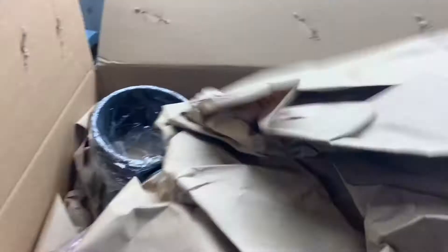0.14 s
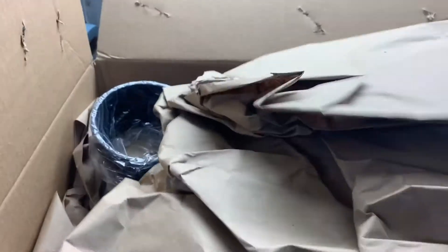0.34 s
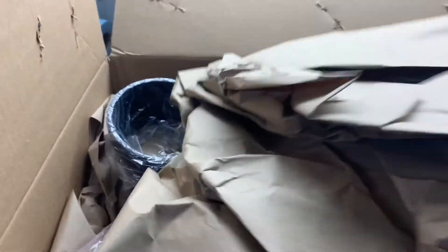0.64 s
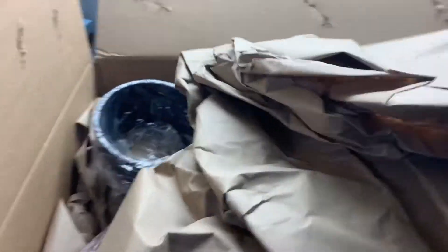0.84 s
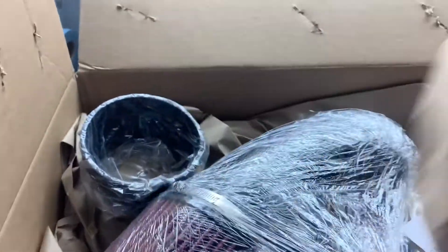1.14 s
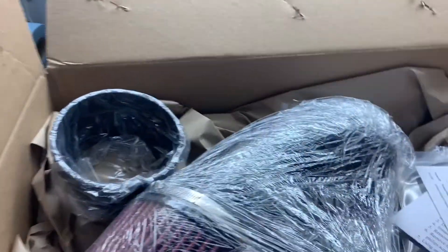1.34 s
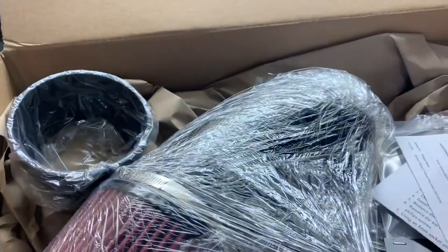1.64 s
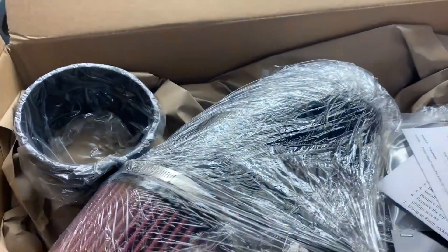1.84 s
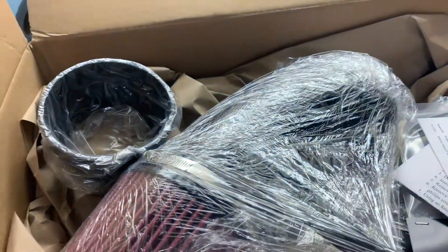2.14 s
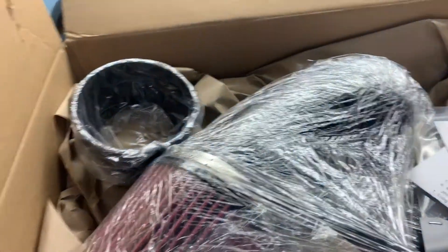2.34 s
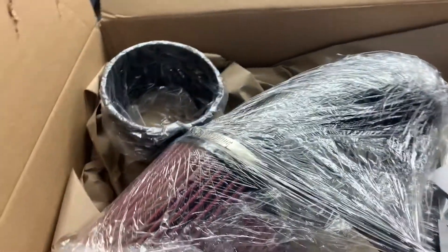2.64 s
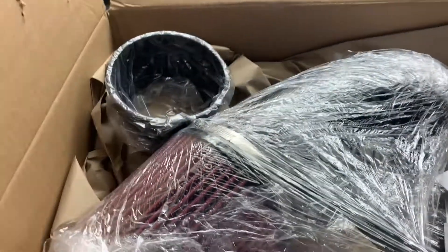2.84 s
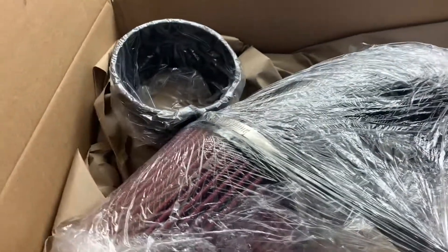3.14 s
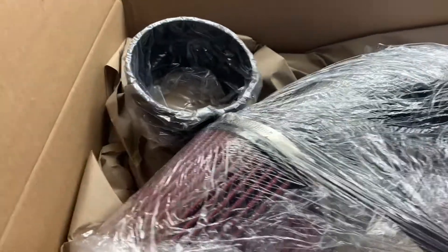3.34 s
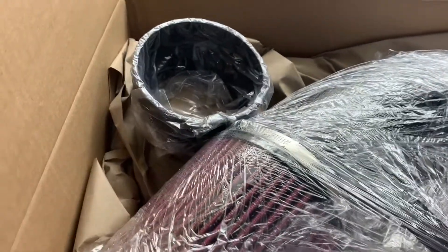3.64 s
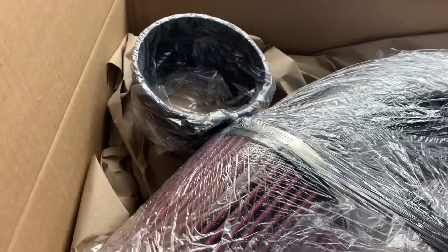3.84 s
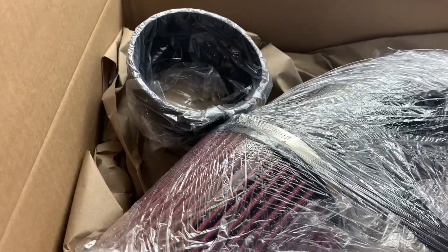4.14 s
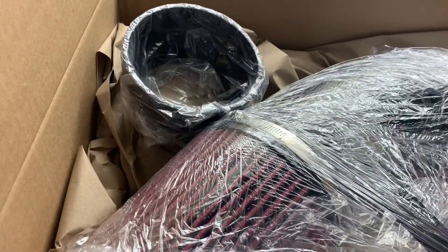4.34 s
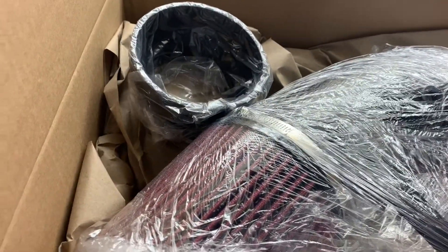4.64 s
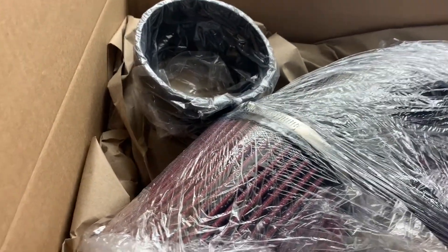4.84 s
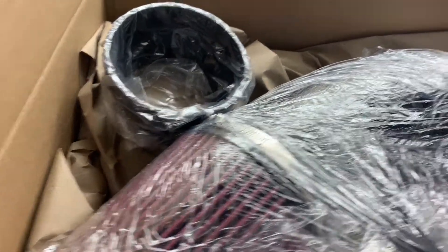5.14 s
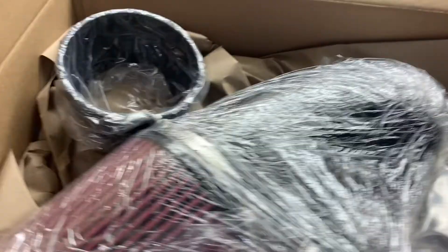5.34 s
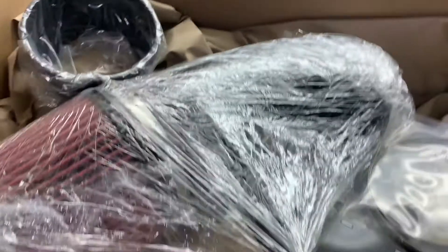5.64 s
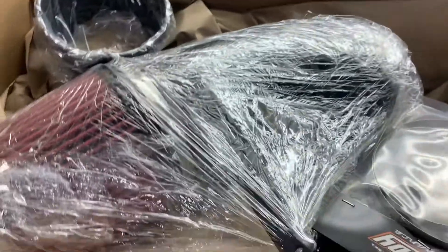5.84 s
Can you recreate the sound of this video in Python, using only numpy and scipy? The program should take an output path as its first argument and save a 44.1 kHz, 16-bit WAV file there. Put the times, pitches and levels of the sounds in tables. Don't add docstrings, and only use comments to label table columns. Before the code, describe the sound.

Stiff packing paper is handled close to a stereo microphone inside a cardboard box, with short dull boxy reflections. From the very start a loud burst of crumpling hits, with small low bumps; until about 1.1 s the sheet is dragged with hissing rustle, clumped crackles and many sharp crease snaps, surging again around 0.7-1.0 s. The rustle then drops to softer, slower folds. Between 1.85 and 2.05 s several low muffled thumps drum on the box walls, the strongest just before 2 s, with a renewed brush of paper. From 2.2 to 3.3 s moderate crinkles and swells continue, gradually thinning. After that it is mostly quiet, with faint easing rustle and separate snaps near 3.6 and 4.45 s, and a brighter, louder one at 4.65 s. Around 5.1-5.5 s wrapping rubs softly and dully along cardboard, followed by tiny settling ticks.

```python
import sys
import numpy as np
from scipy import signal
from scipy.fft import rfft, irfft, next_fast_len
from scipy.io import wavfile
from scipy.ndimage import uniform_filter1d

SR = 44100
rng = np.random.default_rng(int(sys.argv[2]) if len(sys.argv) > 2 else 0)


def to_wav(sig):
    pcm = np.clip(np.atleast_2d(sig), -1, 1) * 32767
    pcm = np.round(pcm).astype(np.int16)
    wavfile.write(sys.argv[1], SR, pcm.T)


def natural_amplitude(level_db):
    exponent = np.asarray(level_db, float) / 20
    return 10 ** exponent


N = 264335

# (time [s], level of the sliding [dB], crispness of the sheet [dB])
DRAG = [(0.0, -31, -3.5), (0.4, -43.5, -2.5), (0.72, -27.5, -4.5), (0.9, -31.5, -4.5), (1.1, -38, 3),
        (1.3, -47.5, 2), (1.5, -51, -13.5), (1.95, -39.5, -3.5), (2.3, -44, -9), (2.53, -37, -4.5),
        (2.99, -38, -6.5), (3.3, -55.5, 3), (3.77, -56, 5.5), (4.03, -66.5, 7), (4.5, -53.5, 6),
        (4.9, -62, 5.5), (5.35, -67.5, -1.5), (5.99, -62, 4)]
# (frequency [Hz], level [dB])
COLOUR = [(160, 6.5), (280, 5.5), (450, -1.5), (700, -0.5), (1100, 0.5), (1500, 1), (2100, 4), (2800, -1),
          (4200, 5.5), (5500, 3.5), (8000, 5), (11000, 4.5), (14000, 3.5), (17000, -11)]
# (frequency [Hz], share heard by both [0-1])
LIKENESS = [(60, 1), (300, 1), (700, 0.9), (1600, 0.79), (2500, 0.04), (4000, 0.27), (7500, 0.022),
            (10000, 0.61), (13000, 0.98)]
# (frequency [Hz], level difference [dB])
TILT = [(60, -1), (110, 1), (200, 1.5), (380, 1), (700, -1.5), (1290, -2), (2380, 0.5), (4400, -1),
        (8120, -2), (15000, 1)]
ANCHORS_HZ = [350, 2100, 9500]

LEFT_LAG = 13
MOST_ALIKE = 0.975


def in_time(rows):
    s, *columns = np.transpose(rows)
    return [np.interp(np.arange(N) / SR, s, c) for c in columns]


def at_hz(points, hz):
    table_hz, values = np.array(points)[:, 0], np.array(points)[:, 1]
    return np.interp(np.log(hz), np.log(table_hz), values)


def following(level_db, share):
    mean_effort_db = -45
    return mean_effort_db + level_db + share * (in_time(DRAG)[0] - mean_effort_db)


def drift(rate):
    r = np.exp(-80 * np.pi * rate / SR)
    slow = signal.lfilter([1], [1, -2 * r, r * r], rng.standard_normal(N // 40 + 2002))[2000:]
    return np.interp(np.arange(N) / 40, np.arange(len(slow)), slow / slow.std())


def dying(power, t60):
    return signal.lfilter([1], [1, -natural_amplitude(-120 / (max(t60, 0.002) * SR))], power + 1e-18)


def port_noise(white, hz):
    alike = np.clip(at_hz(LIKENESS, hz), 0, MOST_ALIKE)
    shared = np.stack([np.roll(white[0], LEFT_LAG), white[0]])
    side = at_hz(TILT, hz) / 2
    both = np.sqrt(alike) * shared + np.sqrt(1 - alike) * white[1:]
    return both * natural_amplitude(np.array([[side], [-side]]))


def bands(low_hz, per_octave, count):
    edges = low_hz * 2 ** (np.arange(count + 1) / per_octave)
    return [(np.sqrt(a * b), signal.butter(2, [a, b], "band", fs=SR, output="sos"))
            for a, b in zip(edges, edges[1:])]


def rumble():
    # (frequency [Hz], level [dB])
    rumble_tone = [(25, -11), (40, -6), (60, -1.5), (100, -2.5), (160, -40)]
    white, out = rng.standard_normal((2, 3, N)), 0
    for k, (hz, sos) in enumerate(bands(17.96, per_octave=1.817, count=6)):
        gain = natural_amplitude(at_hz(rumble_tone, hz) + 0.83 * drift(2.4))
        out = out + signal.sosfilt(sos, gain * port_noise(white[k % 2], hz))
    return natural_amplitude(following(level_db=-3.5, share=0.37) + 27.5) * out


def thumps():
    # (time [s], strength [dB], hardness [dB per octave])
    pushes = [(0.003, -39, 9.5), (0.005, -33, -17), (0.031, -30, -6), (0.7, -37, 7.5), (0.975, -31, 9.5),
              (0.989, -35, 11.5), (1.49, -33.5, 4.5), (1.519, -31, 3), (1.561, -43, -10), (1.865, -24, -3),
              (1.9, -22.5, 1), (1.931, -23.5, 2), (1.956, -19, -1.5), (1.994, -16.5, 3),
              (2.029, -29.5, 2.5), (3.019, -44, 6), (3.139, -41.5, 11.5), (3.238, -46.5, 9.5),
              (3.26, -49, 12.5), (3.535, -48, 11.5), (3.722, -47.5, 12.5), (4.571, -61, 14),
              (4.646, -42, 12.5)]
    # (frequency [Hz], level [dB], t60 [s])
    walls = [(55, 3, 0.051), (70.7, -2.5, 0.43), (87.3, -0.5, 0.39), (125.7, -5.5, 0.34), (273, -9, 0.079),
             (410, -6.5, 0.042)]
    s, strength_db, hardness_db = np.transpose(pushes)
    luck, out = rng.standard_normal((len(s), len(walls))), np.zeros(N)
    for k, (hz, level_db, t60) in enumerate(walls):
        push_db = strength_db + level_db + hardness_db * np.log2(hz / 90) + 0.77 * luck[:, k]
        clicks = np.zeros(N)
        clicks[(s * SR).astype(int)] = natural_amplitude(push_db)
        r, w = natural_amplitude(-60 / (t60 * SR)), 2 * np.pi * hz / SR
        ringing = signal.lfilter([0, np.sin(w)], [1, -2 * r * np.cos(w), r * r], clicks + 1e-18)
        out += (-1) ** k * ringing
    soft = signal.sosfilt(signal.butter(3, [52, 450], "band", fs=SR, output="sos"), out)
    return np.stack([np.roll(soft, LEFT_LAG // 2), soft])


def rub():
    # (frequency [Hz], width [Hz], gain)
    rub_body = [(261, 24, 8.2), (420, 40, 3.5), (915, 41, 2.3)]
    start_s, attack_s, hold_s, release_s = 5.06, 0.1, 0.28, 0.045
    s = start_s + np.cumsum([0, attack_s, hold_s, release_s])
    stroke = np.interp(np.arange(N) / SR, s, [0, 1, 1, 0])
    gain = stroke * natural_amplitude(-56 + 11.5 + 3.2 * drift(21.0))
    sos = signal.butter(4, [230, 1750], "band", fs=SR, output="sos")
    drag = signal.sosfilt(sos, gain * port_noise(rng.standard_normal((3, N)), 470))
    hums = [hum * signal.lfilter(*signal.iirpeak(hz, hz / width_hz, fs=SR), drag)
            for hz, width_hz, hum in rub_body]
    return drag + sum(hums)


def crackle(per_s, spread_db, clump_db, t60, count):
    clumps = natural_amplitude(clump_db * drift(5.0))
    born = rng.random((count, N)) < per_s * clumps / SR
    sizes = natural_amplitude(2 * spread_db * np.minimum(rng.exponential(1, (count, N)), 4))
    trains = dying(dying(born * sizes, t60), t60 / 4)
    return trains / trains.mean(axis=1, keepdims=True)


def rustle():
    anchor_widths_hz = [520, 3500, 9000]
    slide_db, crisp_db = in_time(DRAG)
    lows_db = following(level_db=-4.5, share=0.68)
    bright_db = following(level_db=-6.5, share=0.92) + crisp_db
    levels_db = (lows_db, slide_db, bright_db)
    per_hz = [db - 10 * np.log10(w) for db, w in zip(levels_db, anchor_widths_hz)]

    folds = crackle(per_s=200, spread_db=3.0, clump_db=1.5, t60=0.057, count=4)
    fold_hz = np.geomspace(400, 11000, 4)
    ticks = crackle(per_s=95, spread_db=3.5, clump_db=3.0, t60=0.006, count=2)
    folds = folds + np.repeat(ticks * [[0.1], [0.45]], 2, axis=0)

    white, out = rng.standard_normal((2, 3, N)), 0
    for k, (hz, sos) in enumerate(bands(141.0, per_octave=3, count=21)):
        mix = [np.interp(np.log(hz), np.log(ANCHORS_HZ), row) for row in np.eye(3)]
        reach = np.exp(-(np.log(hz / fold_hz) / 3.0) ** 2)
        grain = 0.25 + 0.87 * reach @ folds / reach.sum()
        drag_db = sum(m * db for m, db in zip(mix, per_hz)) + 2.0 * drift(5.0)
        drag_db = drag_db - 0.21 * crisp_db * np.exp(-(np.log(hz / 830) / 0.58) ** 2)
        gain = natural_amplitude(drag_db) * np.sqrt(grain * SR / 2)
        out = out + natural_amplitude(at_hz(COLOUR, hz)) * signal.sosfilt(sos, gain * port_noise(white[k % 2], hz))
    return out


def creases(rows, sudden):
    size = 8192
    strain_s, strain_db = 0.012, -18
    t = np.arange(size) / SR
    age = np.maximum(t - strain_s, 0)
    strain = natural_amplitude(strain_db) * np.clip(t / strain_s, 0, 1) ** 2 * np.exp(-age / 0.0013)
    crack = (age / 0.00084 * np.exp(1 - age / 0.0007)) ** 2

    hz = np.maximum(np.arange(size // 2 + 1) * SR / size, 10)
    alike = np.clip(at_hz(LIKENESS, hz), 0, MOST_ALIKE) ** 0.66
    side = at_hz(TILT, hz) / 2
    late = np.stack([np.exp(-2j * np.pi * hz * LEFT_LAG / SR), np.ones(len(hz))])
    steep = (hz / 170) ** 2 / (1 + (hz / 170) ** 2)
    held_back = np.exp(-1j * np.pi * hz / 250)

    out = np.zeros((2, N + size))
    luck, white = rng.random((len(rows), 13)), rng.standard_normal((len(rows), 3, size))
    for (s, peak_db, bright_db, t60), draw, noise in zip(rows, luck, white):
        rise = 0.002 if sudden else np.clip(0.14 * t60, 0.002, 0.05)
        shape = (1 - np.exp(-age / rise)) ** 2 * natural_amplitude(-60 * age / np.clip(t60, 0.006, 0.18))
        shape = shape / shape.max() * natural_amplitude(-8.5)
        if sudden:
            crack_db = 11 + 0.36 * (peak_db + 17.5) - 13.0
            shape = shape + strain + natural_amplitude(crack_db) * crack
        fibres = np.repeat(natural_amplitude(2.15 * noise[0, :size // 32]), 32)
        shared, *own = rfft(noise * shape * fibres)
        both = np.sqrt(alike) * late * shared + np.sqrt(1 - alike) * np.array(own)

        balance_db = [-14.5 - bright_db + 16.0, 0, -9.5 + bright_db - 0.5]
        level_db = peak_db - 5.5 + np.interp(np.log(hz), np.log(ANCHORS_HZ), balance_db)
        modes = 250 * 40 ** draw[:12, None]
        resonances = 1j * hz / 19.8 * modes / (modes ** 2 - hz ** 2 + 1j * hz * modes / 18.3)
        rings = 1 + 1.15 * np.sum(resonances, axis=0)
        lean_db = (side + 1.35 * (draw[12] - 0.6)) * np.array([[1], [-1]])
        tone = natural_amplitude(level_db + lean_db + at_hz(COLOUR, hz))
        burst = irfft(both * rings * steep * tone * held_back)
        start = int((s - strain_s) * SR) - SR // 500
        out[:, max(start, 0):start + size] += burst[:, max(-start, 0):]
    return out[:, :N]


def snaps():
    # (time [s], peak [dB], brightness [dB], t60 [s]) creases snapping while the sheet is pulled out
    pull_snaps = [(0.0236, -5, 0.5, 0.11), (0.0357, -10, -13, 0.024), (0.0747, -10, 2, .025),
                  (0.1202, -17.5, 8, 0.025), (0.2023, -10, 2.5, 0.048), (0.2303, -9.5, -2, 0.046),
                  (0.2713, -10.5, 3, 0.069), (0.3311, -10, 1, 0.058), (0.3589, -12, -3, 0.13),
                  (0.392, -20.5, 16, 0.024), (0.4052, -20, 15, 0.025), (0.4139, -5.5, 4.5, 0.038),
                  (0.428, -20, -3, 0.028), (0.4343, -15, 5, 0.18), (0.4853, -10, 6, 0.065),
                  (0.5031, -11, 5, 0.022), (0.5527, -6.5, 4.5, 0.035), (0.5636, -4, 2, 0.037),
                  (0.6554, -8, -6, 0.021), (0.7034, -15, -17.5, 0.096), (0.8049, -6, -1, 0.19),
                  (0.87, -12.5, 9, .034), (0.8905, -6.5, -5, 0.049), (0.9068, -22, -5, .04),
                  (1.0185, -10.5, 2.5, 0.14)]
    settle_snaps = [(1.6392, -27, -3, 0.041), (1.8233, -24, 0, 0.046), (1.925, -13.5, -6.5, 0.12),
                    (2.0271, -24.5, 14.5, 0.017), (2.233, -19.5, 0.5, 0.13), (2.2956, -18.5, 0.5, 0.23),
                    (2.3291, -12, -1.5, 0.016), (2.7506, -16, -2.5, 0.082), (3.1369, -15, -6, 0.18),
                    (3.1895, -19.5, -10, 0.16), (3.237, -16, -0.5, 0.023), (3.5458, -40, 2, .035),
                    (3.5852, -11.5, -1, 0.055), (3.6502, -27, 14, 0.019), (3.6581, -14.5, 5, 0.034),
                    (3.7208, -23.5, 2, 0.032), (3.895, -25, 3.5, 0.1), (3.9518, -30.5, -6, 0.064),
                    (4.4431, -16.5, -3, 0.032), (4.493, -18.5, -2.5, 0.061), (4.5371, -21.5, -7, 0.016),
                    (4.572, -21.5, -12, 0.025), (4.6463, -8, 6, 0.073), (4.65, -23, -22, 0.0089),
                    (4.958, -26.5, 2, 0.031), (5.1323, -33.5, 1, 0.3), (5.4836, -31.5, 4.5, 0.087),
                    (5.626, -34, 5, .05), (5.6637, -34, -6, 0.05), (5.8026, -34, -6, 0.03)]
    swells = [(0.0014, -2.5, -6.5, 0.06), (0.017, -0.5, -2, 0.096), (0.1874, -32, -2, .14),
              (0.3194, -20, 10.5, 0.18), (0.5938, -14.5, 1, .12), (0.6572, -7, -1.5, 0.12),
              (0.7316, -6.5, -3, 0.056), (0.8244, -7.5, -7, 0.12), (0.9455, -7.5, -4.5, 0.2),
              (0.9683, -17.5, -16.5, 0.15), (1.039, -9, -6, 0.12), (1.2188, -21.5, 3, 0.39),
              (1.312, -18, -2, 0.062), (1.3628, -17.5, -5, .06), (1.4435, -24, 6, 0.38),
              (1.4955, -17.5, -9, 0.11), (1.7154, -15, -5.5, 0.079), (1.8494, -15.5, -3, 0.1),
              (1.8994, -18, -1, 0.065), (1.9644, -15, -2.5, 0.12), (2.3163, -14.5, -0.5, 0.13),
              (2.4526, -18, 1, 0.13), (2.5494, -16.5, -2, .17), (2.6349, -17, -4.5, 0.097),
              (2.9044, -13.5, -3, 0.44), (2.9734, -13, -9.5, 0.23), (3.0474, -19.5, -4, 0.21),
              (3.3742, -33, 22, 0.048), (3.4785, -19, 3, 0.092), (3.5272, -22.5, 2.5, 0.14),
              (3.6052, -25.5, 3.5, 0.16), (3.761, -33.5, 4, 0.38), (3.845, -34, 1, 0.12),
              (3.917, -35, -10, 0.09), (4.0863, -34, 4.5, 0.16), (4.1739, -32.5, -1, 0.16),
              (4.247, -33.5, 5, 0.13), (4.2909, -24.5, -1, .12), (4.417, -23.5, 6, 0.18),
              (4.605, -33, -15, .06), (4.7394, -43.5, 18.5, 0.23), (4.7997, -42.5, 22, 0.18),
              (4.8586, -44, 22, 0.15), (4.9376, -29.5, -0.5, 0.03), (5.106, -42, 9, .17),
              (5.176, -42.5, 9, 0.16), (5.6987, -38.5, -2, 0.33), (5.7784, -28, -3.5, 0.14),
              (5.835, -33, -1, 0.133), (5.8687, -35, -4, 0.15)]
    sharp = creases(pull_snaps, sudden=True) + creases(settle_snaps, sudden=True)
    return sharp + creases(swells, sudden=False)


def box(x):
    echoes, lags = np.zeros_like(x), rng.uniform(0.001174, 0.015, (2, 9))
    for side in range(2):
        for k, lag in enumerate(lags[side]):
            n = int(lag * SR)
            echoes[side, n:] += (-1) ** k * natural_amplitude(-20 - 60 * lag / 0.62) * x[side, :-n]
    return x + signal.sosfilt(signal.butter(1, 5500, fs=SR, output="sos"), echoes)


def scene():
    return box(rustle() + snaps() + rub()) + rumble() + thumps()


def band_limit(x):
    return signal.sosfilt(signal.butter(12, 16670, fs=SR, output="sos"), x)


def record(dry):
    # (frequency [Hz], width [Hz], gain)
    left_port = (1560, 410, 0.98)
    # (frequency [Hz], level of the sum [dB])
    sum_gaps = [(11250, 0), (11450, -36), (12150, -36), (12300, 0), (14550, 0), (14700, -45)]
    port_hz, width_hz, gain = left_port
    cavity = signal.lfilter(*signal.iirpeak(port_hz, port_hz / width_hz, fs=SR), dry[0])
    left = dry[0] + gain * cavity
    left, right = 0.95 * np.tanh(np.stack([left, dry[1]]) / 0.95)

    size = next_fast_len(N)
    hz = np.maximum(np.arange(size // 2 + 1) * SR / size, 10)
    mid, side = (left + right) / 2, (left - right) / 2
    thinned = irfft(rfft(mid, size) * natural_amplitude(at_hz(sum_gaps, hz)), size)[:N]
    edge = np.diff(side, prepend=0) ** 2
    sudden = uniform_filter1d(edge, size=1500) > 1.4 * uniform_filter1d(edge, size=6000)
    kept = uniform_filter1d(sudden * 1.0, size=400)
    mid = thinned + 1.14 * kept * (mid - thinned)

    top_cut = signal.cheby2(16, 60, 16500, fs=SR, output="sos")
    x = signal.sosfilt(top_cut, np.stack([mid + side, mid - side]))
    return band_limit(x)


dry = scene()
out = record(dry)
to_wav(out)
```